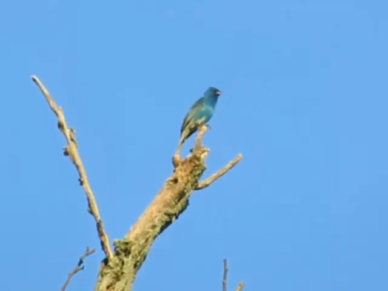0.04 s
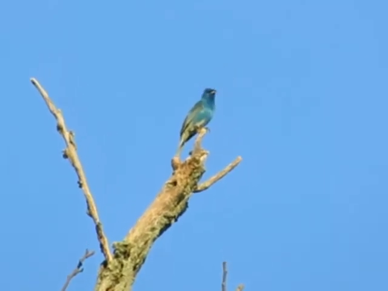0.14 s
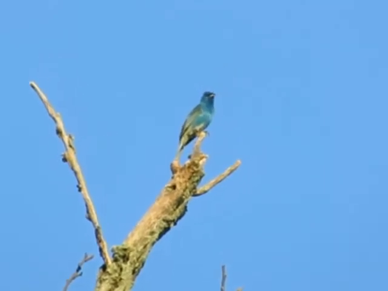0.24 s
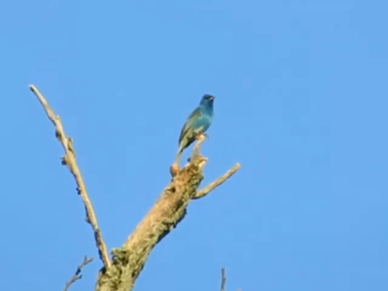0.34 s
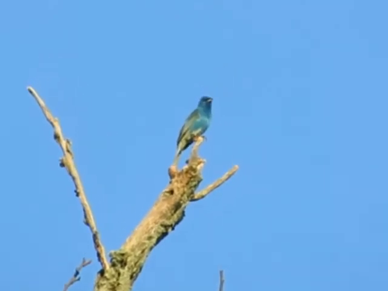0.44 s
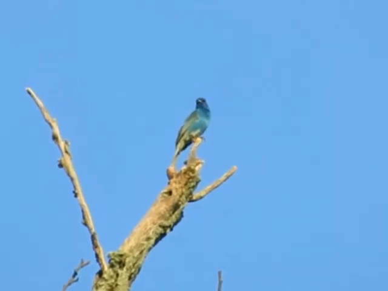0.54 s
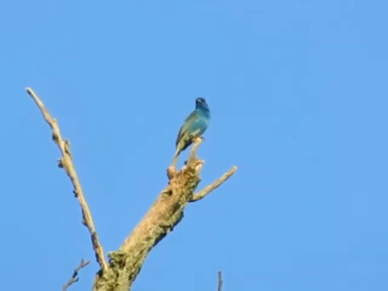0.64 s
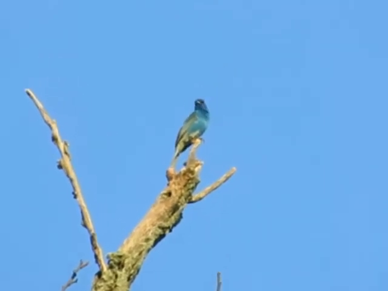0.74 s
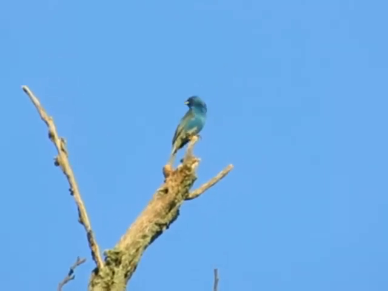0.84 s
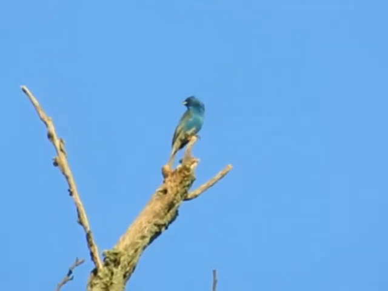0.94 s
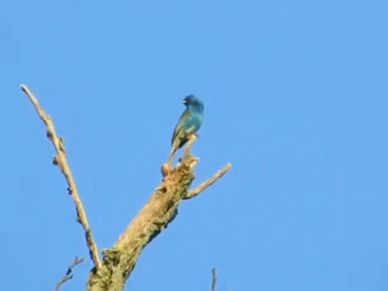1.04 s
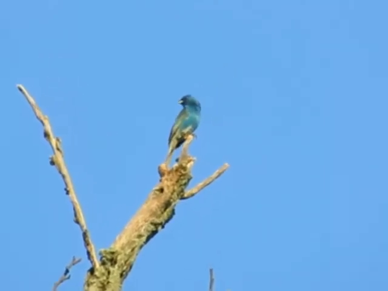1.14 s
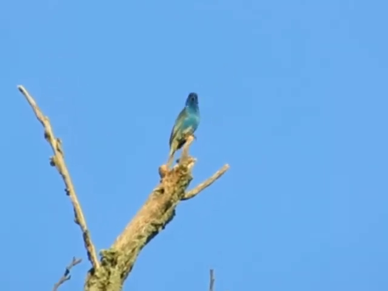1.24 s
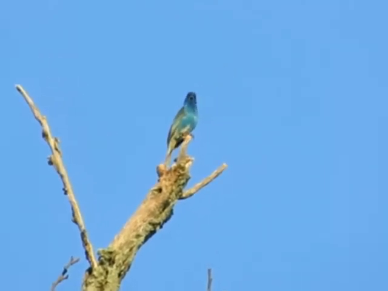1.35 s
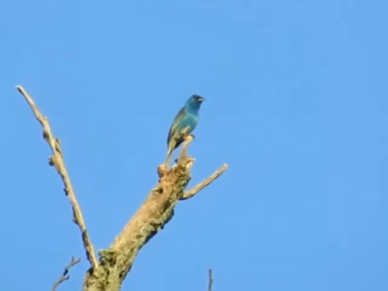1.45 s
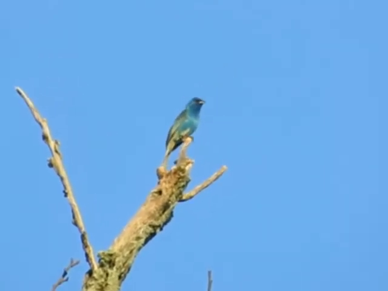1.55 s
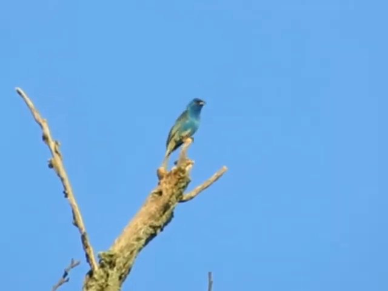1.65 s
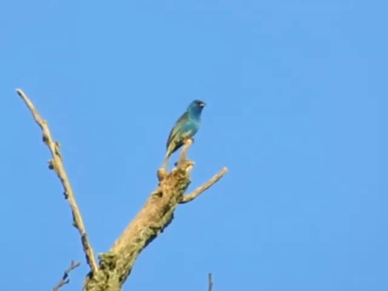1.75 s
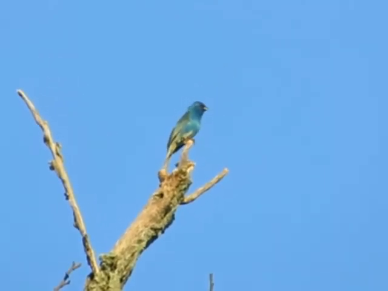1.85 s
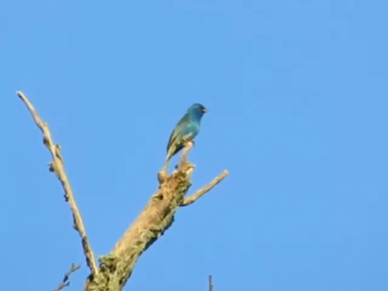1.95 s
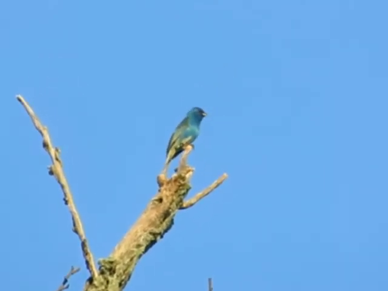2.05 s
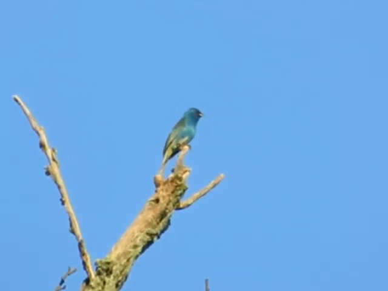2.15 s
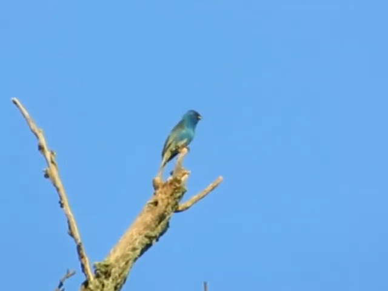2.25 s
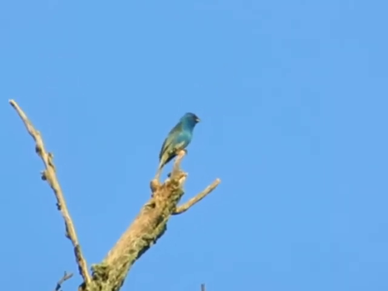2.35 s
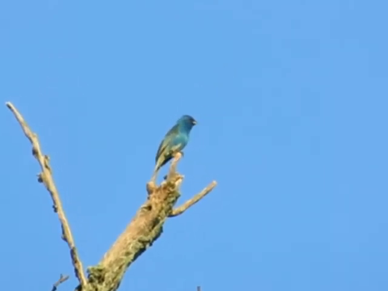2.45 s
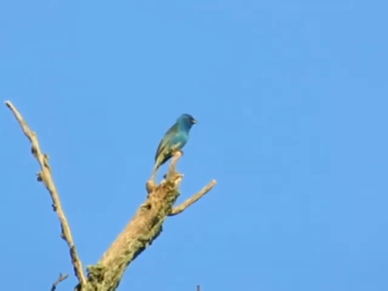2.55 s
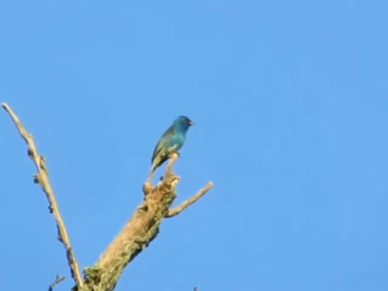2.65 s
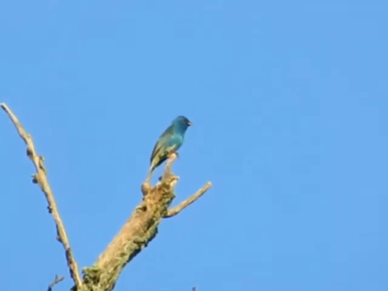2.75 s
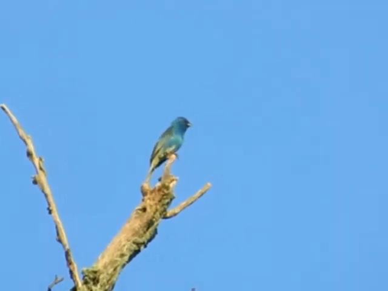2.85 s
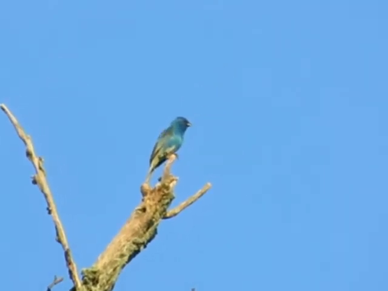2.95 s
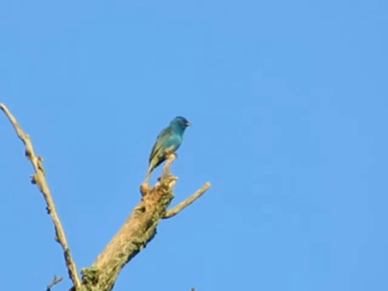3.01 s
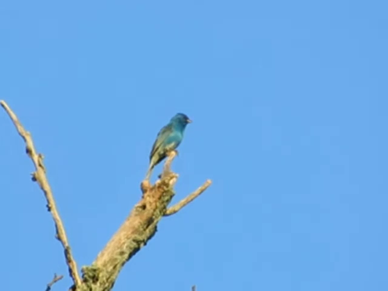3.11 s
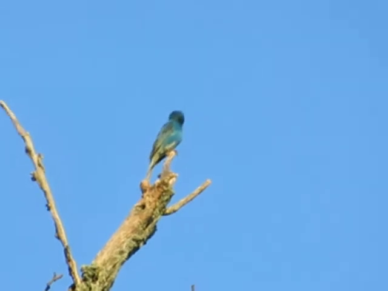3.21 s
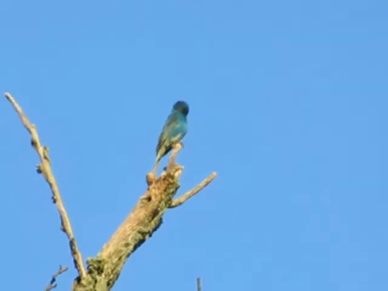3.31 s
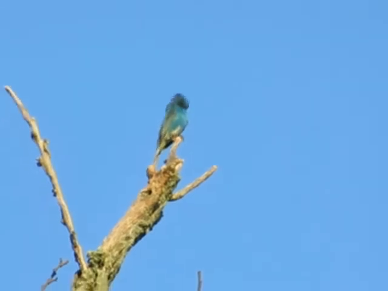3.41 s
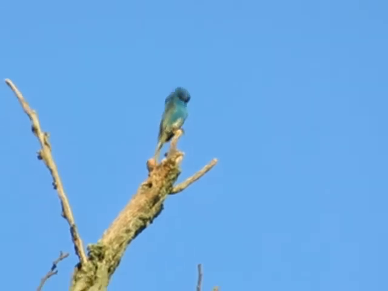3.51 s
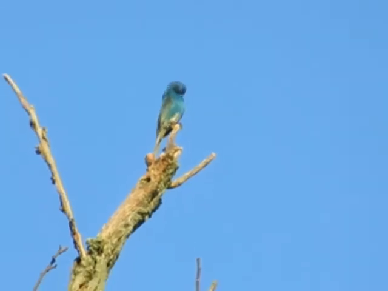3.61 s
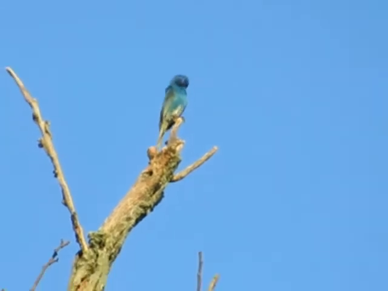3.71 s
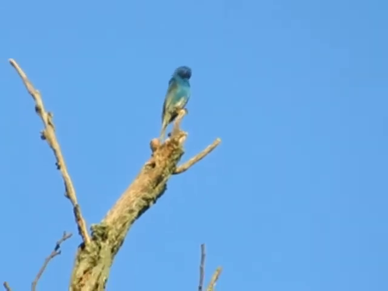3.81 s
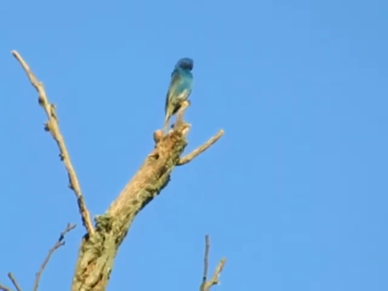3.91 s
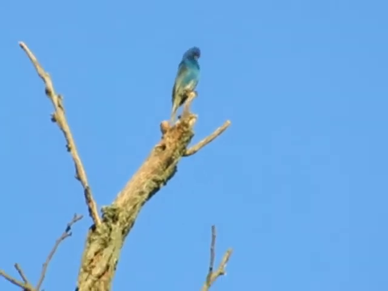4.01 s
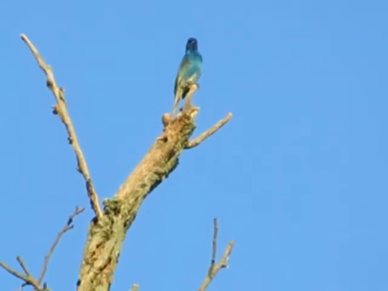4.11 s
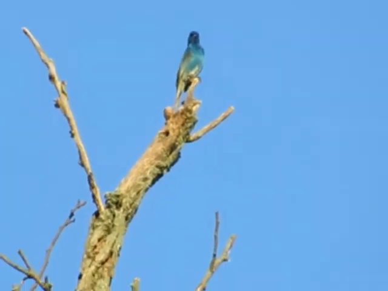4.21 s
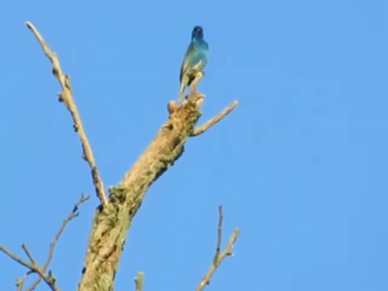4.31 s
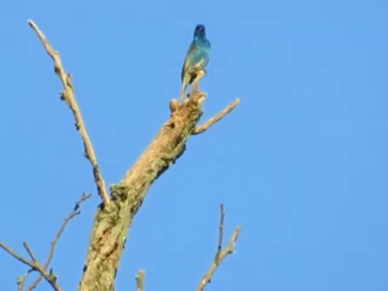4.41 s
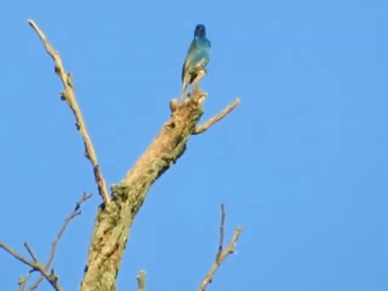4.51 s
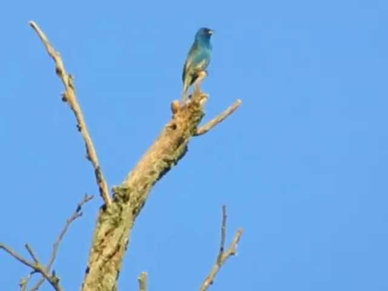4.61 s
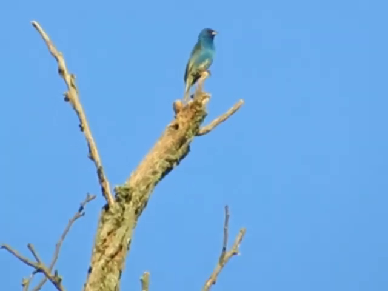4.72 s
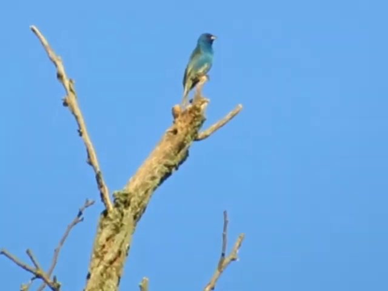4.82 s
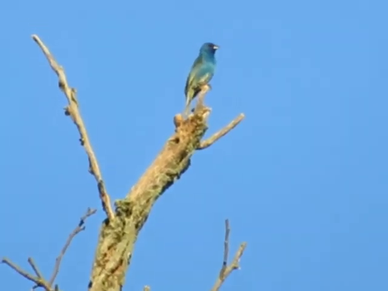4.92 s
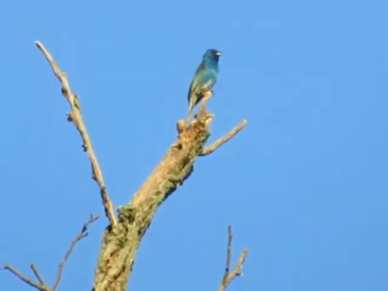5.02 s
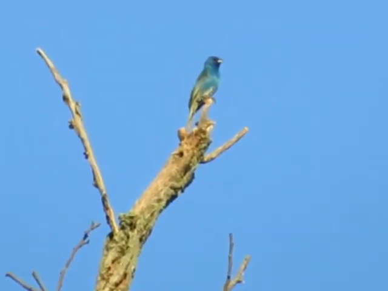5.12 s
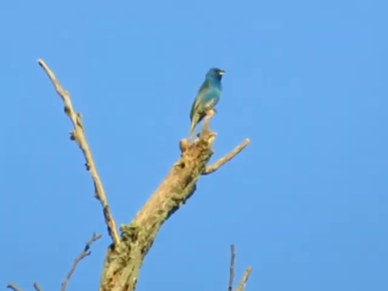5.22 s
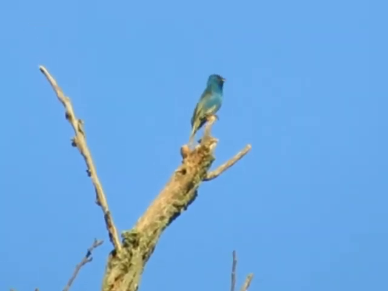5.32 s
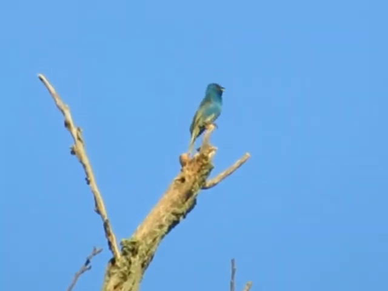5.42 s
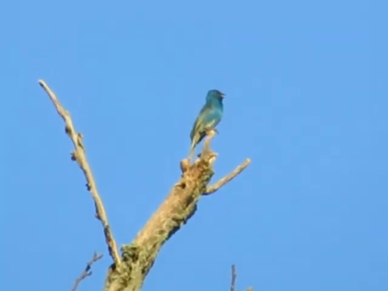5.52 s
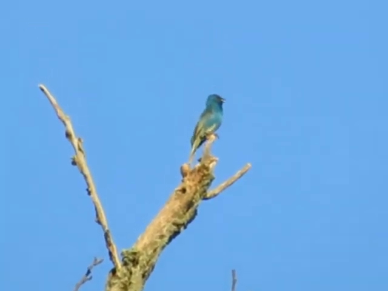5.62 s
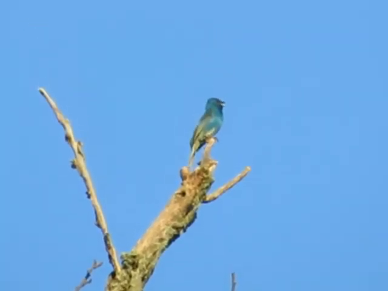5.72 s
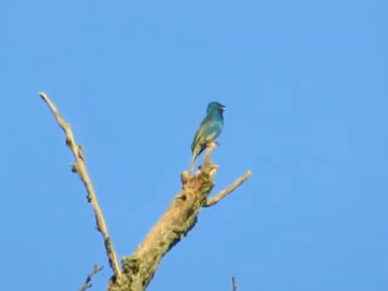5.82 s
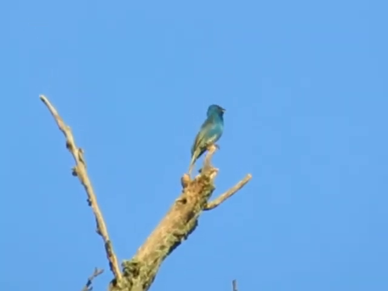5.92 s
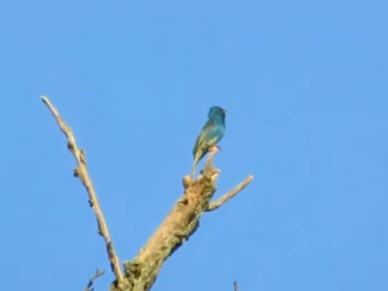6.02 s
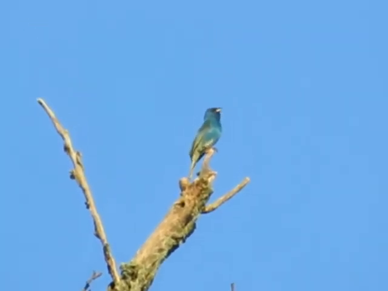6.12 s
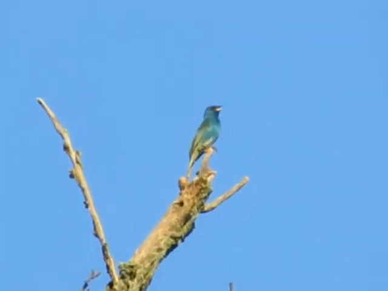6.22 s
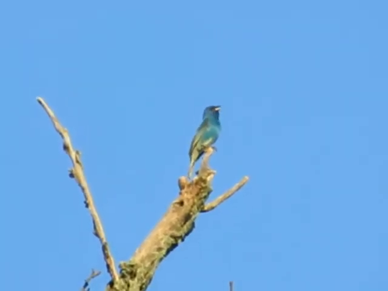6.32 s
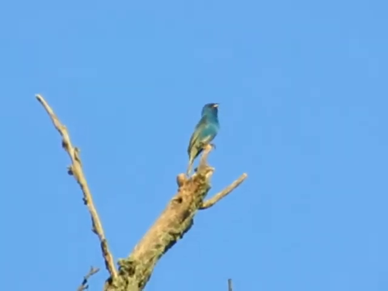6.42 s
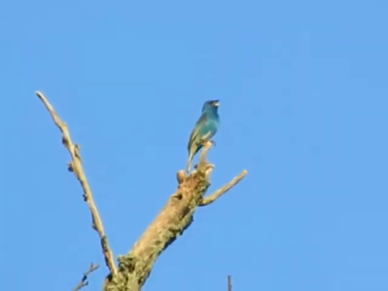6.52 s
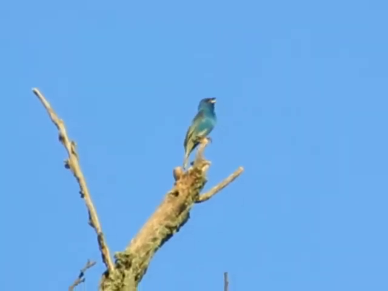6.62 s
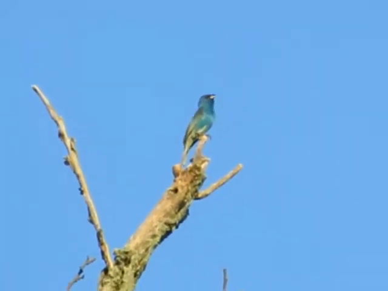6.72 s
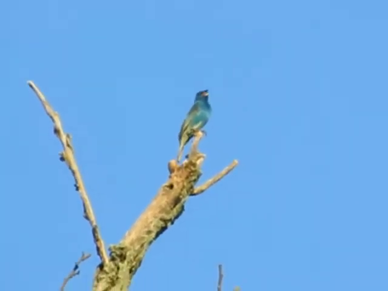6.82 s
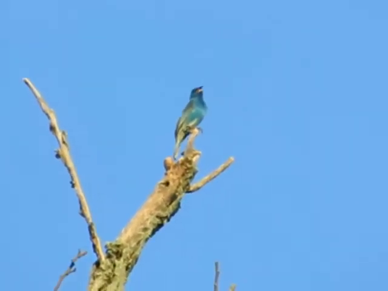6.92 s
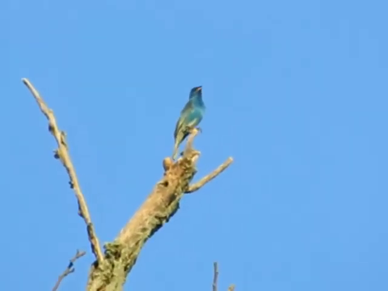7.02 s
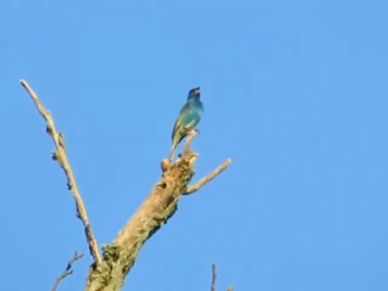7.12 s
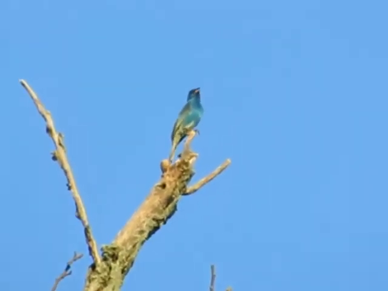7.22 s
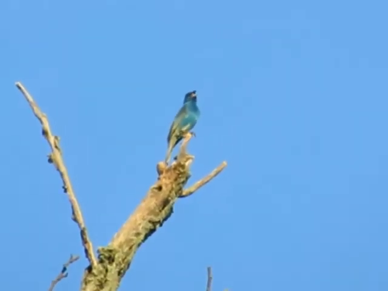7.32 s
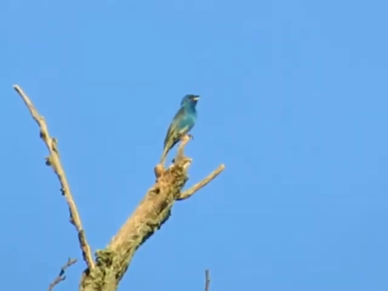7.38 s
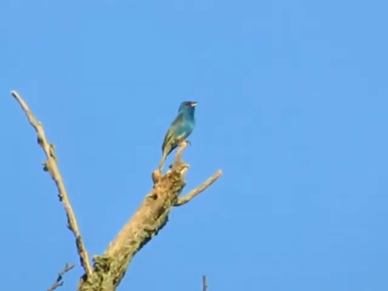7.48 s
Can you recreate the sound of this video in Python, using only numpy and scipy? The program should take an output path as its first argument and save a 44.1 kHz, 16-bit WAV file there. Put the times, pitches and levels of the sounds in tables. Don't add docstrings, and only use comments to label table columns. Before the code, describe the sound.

Open woodland ambience: a thin, steady high cricket trill, soft air hiss and faint low rumble throughout. Scattered faint bird calls come from far trees with a short woodland echo. Past the middle, a small songbird starts softly with falling slides, then builds through paired plunges, chips, arching whistles and buzzes to loud rippling notes. One sharp twig snap clicks near the end. Stereo field microphone, singer centred, insects and air spread wide.

```python
import sys
import numpy as np
from scipy import signal
from scipy.fft import rfft, irfft
from scipy.io import wavfile
from scipy.ndimage import uniform_filter1d

SR = 44100
rng = np.random.default_rng(int(sys.argv[2]) if len(sys.argv) > 2 else 0)


def invert_db(x):
    u = np.asarray(x, float) / 20
    return 10 ** u


def put_to_file(sound):
    columns = np.atleast_2d(sound).T
    safe = np.clip(columns, -1, 1)
    whole_steps = np.round(safe * 32767)
    wavfile.write(sys.argv[1], SR, whole_steps.astype(np.int16))


N = 332955
TIME = np.arange(N) / SR

# frequency in Hz, level in dB per Hz.
RUMBLE = [(11, -36), (18, -10), (54, -0.5), (129, -2.5), (272, -11), (385, -14), (452, -13.5), (611, -19),
          (789, -16.5), (886, -19.5), (1410, -24.5), (2240, -27), (3400, -32), (4600, -38), (5980, -72),
          (10100, -120)]
# frequency in Hz, level in dB per Hz.
HISS = [(2400, -38), (4000, -20), (4800, -17), (5400, -6), (6200, -24.5), (7600, -27), (8200, -32),
        (8600, -33), (9600, -37), (12000, -40), (15500, -38.5)]
# frequency in Hz, side minus middle in dB.
WIDTH = [(20, -37), (60, -32), (110, -21), (200, -5.5), (380, 2.5), (690, 0), (1280, 4), (2360, 4),
         (4360, 3), (6500, -13), (7900, 10.5), (9000, 5.5), (14800, 7)]
# frequency in Hz, width in Hz, lift in dB.
DRONES = [(62, 12, 3), (124.3, 6.5, 4.5)]
# time in seconds, level in dB.
CHATTER = [(0, -69), (.6, -70.5), (1.15, -61), (1.6, -72), (2.45, -62.5), (2.8, -65), (4.2, -75),
           (6, -64.5), (7.55, -69.5)]
CHATTER_HZ = (1120, 3300)
# wing pitch in Hz, strokes per second, level in dB, left lag in seconds,
# left minus right in dB.
CRICKETS = [(5358, 38.4, -59, .00003, -3.5), (5340, 38.0, -67, -0.0048, -1),
            (5350, 38.9, -69.5, .00005, -6.5), (5233, 41.0, -60, 0.0077, 1), (5460, 70, -74.5, -0.02, 4.5),
            (5950, 72, -71.5, .00008, 2)]
# time in seconds, level in dB.
CHORUS = [(0.0, 0.5), (7.55, -0.5)]
# start in seconds, peak in dB, ring in Hz.
SNAPS = [
    (6.681, -17.5, 2540),
    (7.005, -62.5, 1980),
]

# seconds after the start, pitch in Hz, level in dB.
CAROL = [(0, 2930, 0), (.02, 2980, -3), (.033, 2390, -6), (.055, 2430, -2.5), (.088, 2720, -6),
         (.11, 2350, -1), (.145, 1800, -5), (.18, 2300, -2.5), (.205, 2500, -14)]
DROOP = [(0, 2230, -3), (.035, 2130, 0), (.07, 2090, -9)]
SINK = [(0, 3150, -1.5), (.035, 3090, -3), (.07, 2940, -3), (.095, 2520, -5), (.128, 2170, -5)]
WARBLE = [(0, 4410, -9), (.012, 3400, -3), (.022, 3650, -6), (.030, 3150, -10), (.039, 2860, -5),
          (.056, 3600, 0), (.068, 2980, -1), (.08, 2680, -12)]
# start in seconds, level in dB,
# stretch in time, pitch ratio, lean in dB from start to end.
FAR_SONGS = [
    (CAROL, [(2.106, -58, 1.02, .985, 1), (2.808, -64, 1.02, .985, -10), (4.895, -59, 0.97, 1.008, 1.1), (5.364, -58.5, .98, 1.015, -2)]),
    (DROOP, [(.09, -60, 1.0, 1.0, 6), (3.36, -63, 1.0, 0.99, -4), (3.91, -62, 1.0, 0.98, 1.1)]),
    (SINK, [(6.005, -53, 0.96, 1.0, .1)]),
]
# start in seconds,
# level in dB, stretch in time, pitch ratio, lean in dB from start to end.
WARBLES = [
    (WARBLE, [(1.775, -53, 1.0, 1.01, -7), (3.677, -51.5, 0.91, 0.99, -2), (5.139, -52.5, 1.03, 1.0, -2)]),
    (WARBLE[4:], [(6.562, -48.5, 0.94, 1, -3)]),
]
# start and length in seconds, from Hz, to Hz, level in dB.
FAR_GLIDES = [(.7, 0.04, 3730, 3640, -63), (5.095, 0.03, 5850, 6340, -64), (5.15, .12, 6100, 6260, -66),
              (5.295, 0.078, 6000, 6220, -66), (1.595, .022, 2570, 2100, -64),
              (1.655, .03, 2110, 2400, -69), (2.105, 0.05, 2650, 2990, -64), (1.04, 0.034, 2670, 2480, -66),
              (1.49, 0.12, 3300, 2990, -67.5), (1.578, 0.06, 3110, 3040, -62.5),
              (1.67, 0.035, 2970, 3170, -64.5), (1.615, 0.035, 2065, 2070, -62),
              (1.695, 0.027, 2400, 1930, -60), (1.715, 0.069, 2190, 2244, -62.5),
              (1.753, 0.0125, 3170, 4360, -54), (3.659, .01, 3480, 4360, -59),
              (1.76, 0.057, 3080, 2970, -66), (3.14, 0.023, 2830, 3000, -61), (4.89, 0.12, 6150, 6300, -69),
              (5.11, 0.019, 2940, 3020, -63), (5.178, 0.038, 5450, 4130, -52),
              (5.68, 0.055, 3470, 4130, -50.5), (5.865, 0.024, 3440, 3150, -56),
              (6.09, 0.034, 4870, 3300, -53), (6.99, 0.03, 2100, 1870, -58.5)]
# start and length in seconds, from Hz, to Hz, level in dB.
HOARSE_GLIDES = [(.62, 0.055, 1890, 2950, -67.5), (.805, 0.06, 4380, 5000, -59),
                 (.81, .06, 4250, 4100, -61), (.855, .095, 4760, 4660, -71), (.842, 0.04, 3350, 3760, -62),
                 (.87, 0.089, 3830, 3770, -68), (2.455, 0.061, 4530, 4710, -61.5),
                 (2.575, .045, 4220, 4300, -67), (2.785, 0.032, 4700, 4620, -61),
                 (2.815, .03, 4450, 4250, -65), (2.815, 0.053, 3900, 3640, -65.5),
                 (5.975, 0.087, 4470, 4470, -55)]
# start and length in seconds, from Hz, to Hz, level in dB.
HIGH_GLIDES = [(.425, 0.052, 7400, 7520, -61.5), (.425, 0.055, 8300, 8200, -67),
               (.51, 0.048, 8250, 8450, -64), (.5, .06, 7800, 7850, -70), (1.44, .16, 7400, 7560, -72),
               (1.54, 0.14, 8300, 8600, -72), (2.18, 0.16, 7360, 7400, -76), (2.51, 0.059, 8450, 8370, -65),
               (2.96, 0.076, 7550, 7700, -67), (3.69, 0.15, 8200, 8280, -72), (3.7, 0.15, 7450, 7520, -70),
               (3.95, 0.15, 7290, 7200, -74), (4.63, .07, 7300, 7300, -65), (4.64, 0.13, 8140, 8530, -62.5)]

# multiple of the pitch, level in dB.
OVERTONES = [(2, -29), (3, -35)]
# frequency in Hz, lift in dB.
OVERTONE_LIFT = [(5000, -26), (10000, -16.5), (12000, 7.5), (14000, 6.5), (15500, 8)]
# start in seconds, end in seconds, middle pitch in Hz, swing in Hz,
# warbles per second, level in dB.
BUZZES = [
    (6.6627, 6.722, 5990, 600, 148, -38.5),
    (6.9499, 7.018, 5960, 620, 149, -37),
]
# seconds after the start, pitch in Hz, level in dB.
SLIDE = [(0, 5200, -1), (.025, 4520, 0), (.05, 3790, -1), (.066, 3750, -9)]
PIP = [(0, 3050, -10), (.022, 3560, -3.5), (.042, 3570, -11)]
VEE = [(0, 5480, 10), (.013, 4700, -3), (.024, 4360, 6), (.028, 4000, -18), (.036, 3720, -5),
       (.05, 4640, -2), (.063, 5270, 5)]
PLUNGE = [(0, 8250, -28), (.03, 7840, -14), (.063, 6970, -9.5), (.077, 6100, -0.5), (.09, 4950, 3),
          (.107, 4490, -8)]
HOOK = [(0, 3660, -5), (.014, 4220, -3), (.026, 4300, 3), (.036, 4200, 0)]
SHELF = [(0, 4840, -3), (.014, 5020, 4), (.042, 5035, -8), (.064, 4250, -4.5), (.089, 3560, -6.5),
         (.111, 3100, -16.5)]
LIFT = [(0, 5700, -12), (.025, 6000, -0.5), (.05, 6330, -0.5), (.065, 6350, -6)]
CHIP = [(0, 9500, -28), (.006, 6470, -10), (.011, 5060, -1), (.016, 6420, -6), (.021, 8300, -18)]
ARCH = [(0, 2870, -23), (.03, 2997, -15), (.062, 3190, -13), (.08, 4720, -3), (.094, 4930, -3),
        (.118, 4926, -1), (.132, 4830, -2), (.15, 3520, -13), (.172, 2250, -24)]
SWEEP = [(0, 5390, 4), (.015, 6100, 1.5), (.03, 7100, 1.5), (.045, 7500, -3)]
FLICK = [(0, 5140, -15), (.008, 6300, 0), (.017, 8640, -18)]
FALL = [(0, 6940, -19), (.013, 6430, -15), (.03, 5890, -2), (.04, 4800, 0.5), (.05, 4060, -7),
        (.061, 3670, -8), (.073, 3300, -5), (.09, 2697, -12.5), (.106, 2060, -29)]
HOLD = [(0, 2570, -21), (.012, 3800, -14), (.026, 4280, -8), (.037, 4380, -10.5), (.048, 4500, -11),
        (.057, 4580, -4), (.067, 4555, 0), (.088, 4530, -12), (.097, 4540, -22.5)]
WAVE = [(0, 4575, -12), (.017, 4580, 1.5), (.028, 4250, -9), (.041, 3620, -12)]
RIPPLE_FROM_S, RIPPLE_PERIOD_S = .049, .0253
RIPPLE_HZ, RIPPLE_SWING_HZ, RIPPLE_DB, CREST_DB = 3090, 470, -12, 5
WAVE = WAVE + [(RIPPLE_FROM_S + RIPPLE_PERIOD_S * turn, RIPPLE_HZ - RIPPLE_SWING_HZ * np.sin(2 * np.pi * turn),
        RIPPLE_DB - CREST_DB * np.sin(2 * np.pi * turn)) for turn in np.arange(19) / 8]
# start in seconds, level in dB,
# stretch in time, pitch ratio, lean in dB from start to end.
OPENING = [
    (SLIDE, [(4.265, -62, 1.1, 0.99, 2), (4.515, -59.5, 1.04, 0.99, -1), (4.745, -57, 1.2, 0.99, 3)]),
    (PIP, [(4.468, -61, 1.1, 1.0, 3), (4.702, -61, 1.1, 1, -3)]),
    (VEE, [(4.972, -52, 0.97, 1.0, 0)]),
    (PLUNGE, [(5.034, -52, 1.0, 0.993, -1), (5.307, -46, 1.0, 0.993, -2)]),
    (HOOK, [(5.146, -52, 1.0, 1.0, 0), (5.416, -49, 1.1, .995, -4)]),
    (SHELF, [(5.55, -45, 1.12, 1.005, 7), (5.829, -41, 1.03, 1.005, 3)]),
    (LIFT, [(5.68, -47, 1.0, 1.013, 4), (5.95, -44, 1.0, .994, -2)]),
]
# start in seconds,
# level in dB, stretch in time, pitch ratio, lean in dB from start to end.
CLIMAX = [
    (CHIP, [(6.094, -42, 0.95, 1.0, 10), (6.385, -36, 1.0, 1.0, -1)]),
    (ARCH, [(6.13, -33.5, 1.0, 1.012, 7), (6.419, -32, 0.985, .99, -2)]),
    (SWEEP, [(6.72, -47.5, 1.0, 0.99, 5), (7.015, -43.5, 0.96, 1.0, -3.1)]),
    (WAVE, [(6.768, -32, 1.0, 1.0, -1), (7.063, -29, 0.97, 1.0, 0)]),
    (FLICK, [(7.265, -39.5, 1.0, 1.0, -2)]),
    (FALL, [(7.292, -32.5, 1.0, 1.0, 1)]),
    (HOLD, [(7.415, -27.5, 1.0, 1.0, 0)]),
]


def at_hz(points, hz):
    known_hz, db = np.transpose(points)
    return np.interp(np.log(hz), np.log(known_hz), db)


def rms_one(x):
    return x / np.sqrt(np.mean(x ** 2) + 1e-20)


def drift(rate):
    r = np.exp(-32 * np.pi * rate / SR)
    chance = rng.standard_normal(N // 16 + 3002)
    slow = signal.lfilter([1], [1, -2 * r, r * r], chance)[3000:]
    return np.interp(np.arange(N) / 16, np.arange(len(slow)), rms_one(slow))


def placed(x, lag, pan_db):
    turn = np.exp(-1j * np.pi * np.arange(N // 2 + 1) * SR / N * lag)
    left = irfft(rfft(x) * turn, N) * invert_db(pan_db / 2)
    right = irfft(rfft(x) / turn, N) * invert_db(-pan_db / 2)
    return np.array([left, right])


def air(spectrum):
    hz = np.maximum(np.arange(N // 2 + 1) * SR / N, 1)
    lift_db = sum(db * np.exp(-((hz - centre) / width) ** 2) for centre, width, db in DRONES)
    mid, side = rfft(rng.standard_normal((2, N))) * invert_db(at_hz(spectrum, hz) + lift_db)
    mid, side = irfft(mid, N), irfft(side * invert_db(at_hz(WIDTH, hz)), N)
    return np.array([mid + side, mid - side]) / np.std(mid)


def rumble_and_hiss():
    breeze = invert_db(0.5 * drift(0.6))
    rumble = invert_db(-50.5) * breeze * air(RUMBLE)
    return rumble + invert_db(-61 + 1.46 * drift(33)) * air(HISS)


def chatter():
    out, edges = np.zeros((2, N)), np.geomspace(*CHATTER_HZ, 7)
    for low, high in zip(edges, edges[1:]):
        band = signal.butter(2, [low, high], "band", fs=SR, output="sos")
        out += invert_db(4.5 * drift(12.6)) * signal.sosfilt(band, rng.standard_normal((2, N)))
    return invert_db(np.interp(TIME, *np.transpose(CHATTER))) * rms_one(out)


def crickets():
    octave_db, octave_turn = -22, 1.05
    out, side = np.zeros((2, N)), np.array([[-1], [1]])
    for hz, rate, level_db, lag, pan_db in CRICKETS:
        stroke = np.cumsum(rate * (1 + 0.0103 * drift(2.83))) / SR + rng.random()
        opening = np.clip(np.sin(2 * np.pi * stroke) + .35, 0, 1)
        burst = rms_one(opening * invert_db(1.8 * drift(40)))
        phase = 2 * np.pi * np.cumsum(hz + 25 * drift(31.24)) / SR
        tone = np.sin(phase + side * np.pi * hz * lag) * invert_db(-side * pan_db / 2)
        tone = tone + invert_db(octave_db) * np.sin(2 * phase + side * octave_turn)
        out += np.sqrt(2) * invert_db(level_db) * burst * tone
    return out * invert_db(np.interp(TIME, *np.transpose(CHORUS)))


def woods(x):
    t60_s, cut_hz = 0.57, 6800
    t = np.arange(SR) / SR
    scatter = rng.standard_normal((3, SR))
    decay = invert_db(-60 * t / t60_s) + 1.9 * invert_db(-60 * t / 0.043)
    tail = (1.3 * scatter[2] + scatter[:2]) * decay * np.clip((t - .003) / 0.0016, 0, 1)
    colour = uniform_filter1d(np.abs(rfft(tail.sum(axis=0))) ** 2, size=90)
    tail = irfft(rfft(tail) / np.sqrt(colour), SR)
    tail = signal.sosfilt(signal.butter(2, cut_hz, fs=SR, output="sos"), tail)
    tail = tail / np.sqrt(np.sum(tail ** 2) / 2)
    stirred = x * (.65 + .7 * drift(70))
    return invert_db(1.46 * drift(25)) * signal.fftconvolve(stirred, tail, axes=1)[:, :N]


def snaps():
    out = np.zeros(N)
    for s, peak_db, hz in SNAPS:
        t = np.clip(TIME - s, 0, 1)
        envelope = np.exp(-t / 0.00039) * (1 - np.exp(-t / 0.00025))
        out += invert_db(peak_db) * envelope * np.sin(2 * np.pi * hz * t)
    return out


def glides(rows):
    peak_at, bend = .4, .45
    onset_db, fade_db = -4, -7
    notes = []
    for s, length, from_hz, to_hz, db in rows:
        peak_hz = from_hz + bend * (to_hz - from_hz)
        notes.append([(s, from_hz, db + onset_db), (s + peak_at * length, peak_hz, db),
                      (s + length, to_hz, db + fade_db)])
    return notes


def sung(phrase):
    notes = []
    for shape, repeats in phrase:
        s, hz, shape_db = np.transpose(shape)
        for start, level_db, stretch, ratio, lean_db in repeats:
            note_db = level_db + shape_db + lean_db * (s / s[-1] - .5)
            notes.append(np.transpose([start + stretch * s, ratio * hz, note_db]))
    return notes


def add(out, t, hz, level_db, overtones):
    effort_db, effort_gain = -35, .35
    at = np.round(t * SR).astype(int)
    phase = 2 * np.pi * np.cumsum(hz) / SR
    edge = np.clip(np.minimum(t - t[0], t[-1] - t) / 0.0014, 0, 1)
    tone = np.sin(phase)
    for k, db in overtones:
        strength_db = db + at_hz(OVERTONE_LIFT, k * hz) + effort_gain * (level_db - effort_db)
        tone = tone + invert_db(strength_db) * (k * hz < SR / 2) * np.sin(k * phase)
    out[at] += np.sqrt(2) * invert_db(level_db) * edge * tone


def whistles(notes, overtones, flutter_db, waver):
    out, shimmer, shake = np.zeros(N), 1 + waver * drift(200), drift(140)
    for note in notes:
        s, hz, level_db = np.transpose(note)
        within = (TIME >= s[0]) & (TIME <= s[-1])
        pitch = np.interp(TIME[within], s, hz)
        pitch = uniform_filter1d(pitch, size=120, mode="nearest")
        softness = np.clip((-28 - level_db.max()) / 14, .8, 2.2)
        level_db = np.interp(TIME[within], s, level_db) + flutter_db * softness * shake[within]
        add(out, TIME[within], pitch * shimmer[within], level_db, overtones)
    return out


def buzzes():
    out = np.zeros(N)
    for start, end, hz, swing_hz, rate, level_db in BUZZES:
        t = TIME[(TIME >= start) & (TIME <= end)]
        done = (t - start) / (end - start)
        warble = -np.cos(2 * np.pi * rate * (t - start))
        warble = warble + .2 * drift(300)[:len(t)]
        pitch = hz - 220 * done ** 1.5 + swing_hz * (1 - .35 * done ** 4) * warble
        buzz_db = level_db + 0.9 - 2.0 * warble - 7 * (1 - done) ** 4
        add(out, t, pitch, buzz_db, OVERTONES)
    return out


def near_singer():
    return whistles(sung(OPENING + CLIMAX), OVERTONES, flutter_db=2.5, waver=.002) + buzzes()


def scene():
    far_notes = sung(FAR_SONGS) + glides(FAR_GLIDES)
    far = placed(whistles(far_notes, [], flutter_db=1.4, waver=.004), -.00002, 1.2)
    hoarse = placed(whistles(glides(HOARSE_GLIDES), [], flutter_db=1.2, waver=0.034), -0.000012, 0)
    high = placed(whistles(glides(HIGH_GLIDES), [], flutter_db=3.0, waver=0.014), .00005, 0)
    warbler = placed(whistles(sung(WARBLES), [], flutter_db=2.2, waver=.012), -.00002, 1.2)
    singer = placed(near_singer() + snaps(), -0.00001, .1)
    insects = crickets()
    into_woods = invert_db(-8.0) * singer + invert_db(-5.5) * far + invert_db(2.0) * hoarse
    into_woods += invert_db(-5.0) * warbler + invert_db(-5.5) * high + invert_db(-6.5) * insects
    birds = singer + far + warbler + hoarse + high
    return birds + insects + woods(into_woods) + chatter() + rumble_and_hiss()


def low_pass(x):
    return signal.sosfilt(signal.butter(12, 15440, fs=SR, output="sos"), x)


def record(dry):
    top_cut = signal.cheby2(12, 70, 16000, fs=SR, output="sos")
    mix = signal.sosfilt(top_cut, dry)
    return low_pass(mix)


dry = scene()
out = record(dry)
put_to_file(out)
```